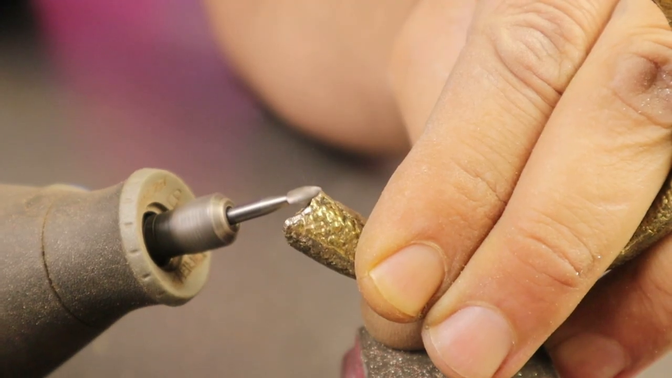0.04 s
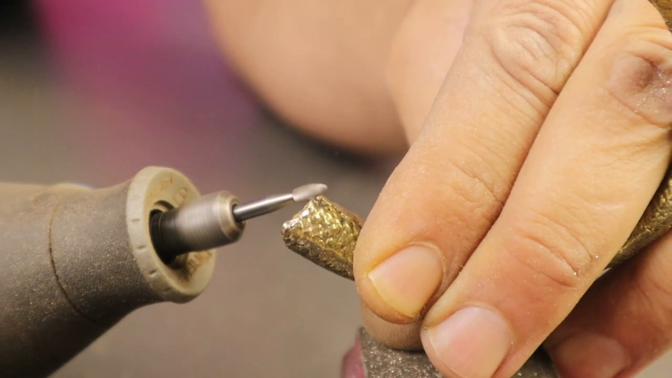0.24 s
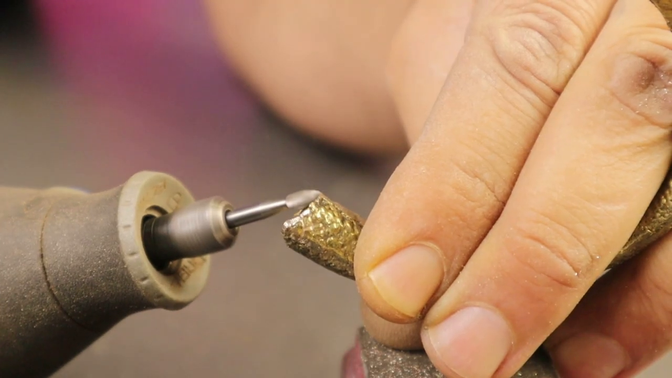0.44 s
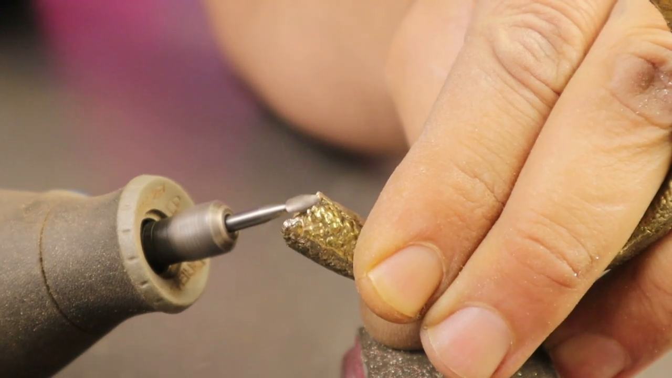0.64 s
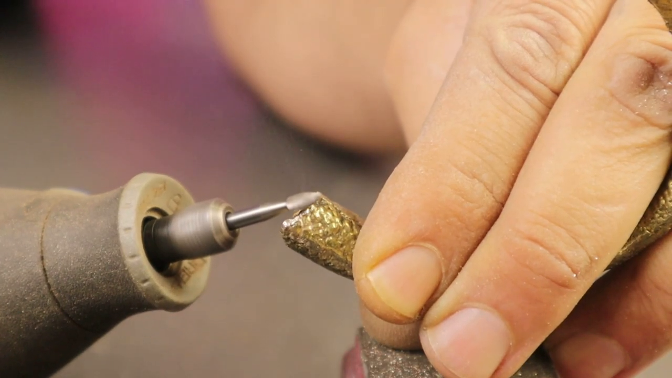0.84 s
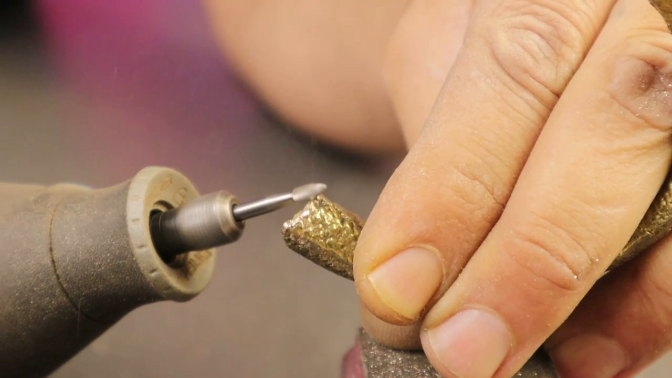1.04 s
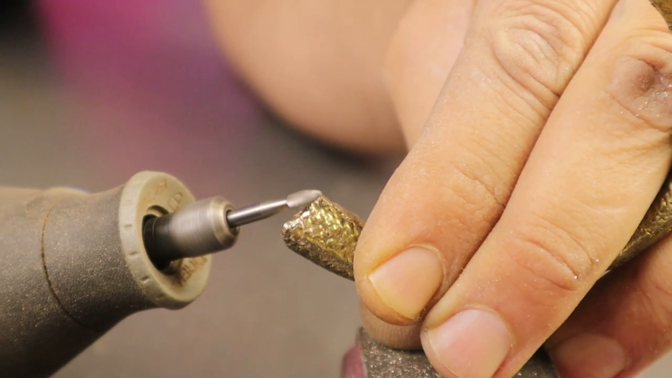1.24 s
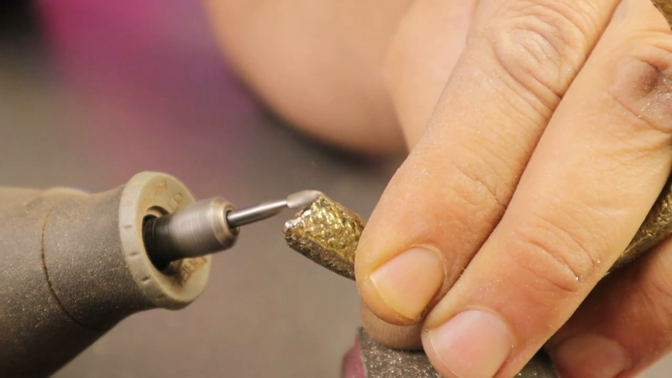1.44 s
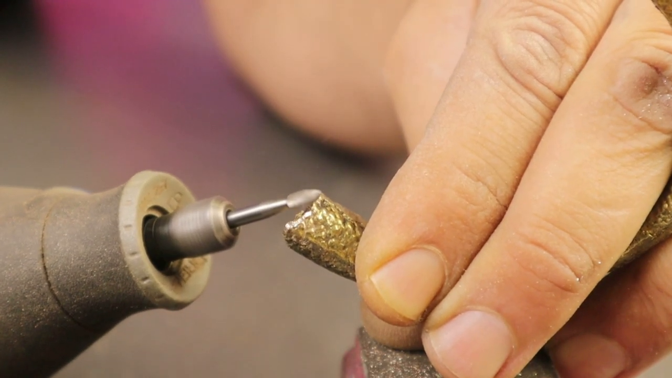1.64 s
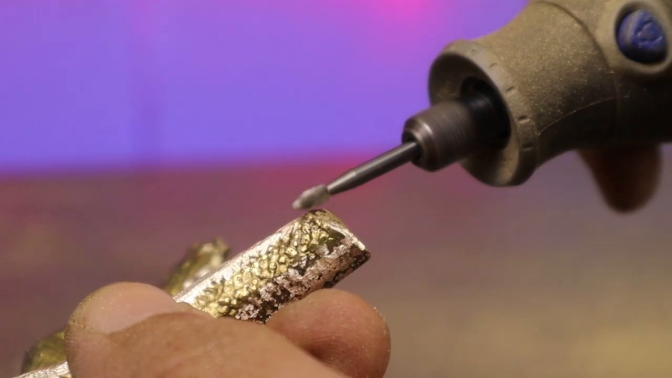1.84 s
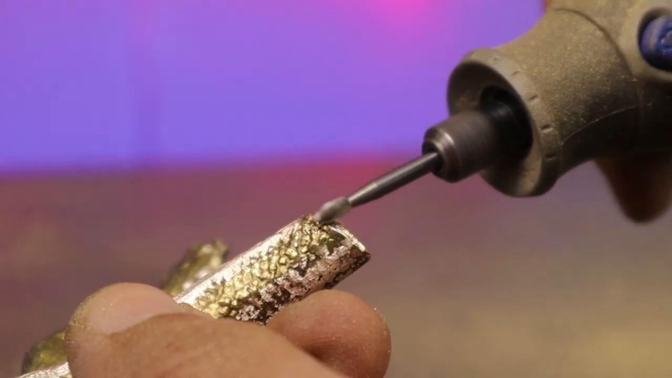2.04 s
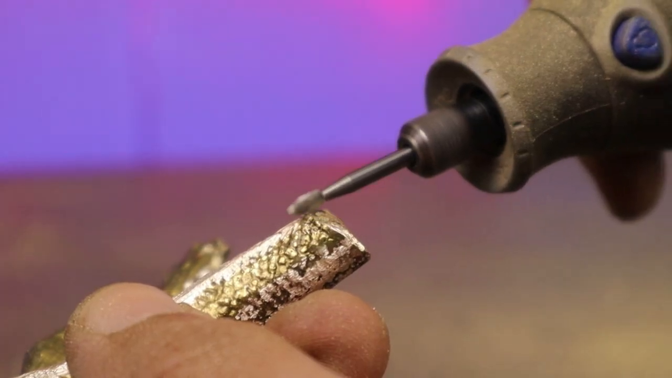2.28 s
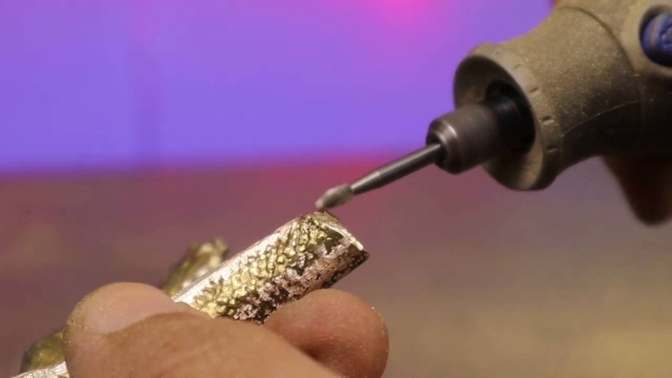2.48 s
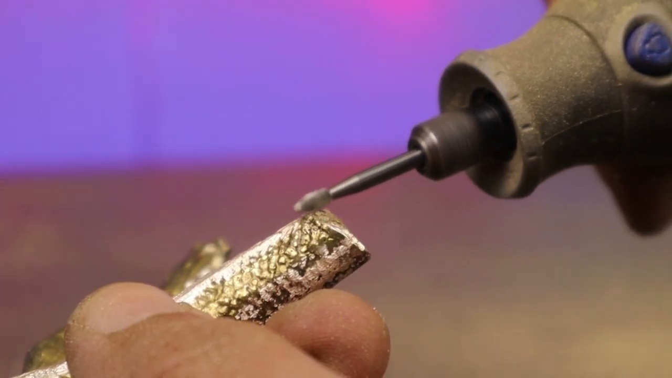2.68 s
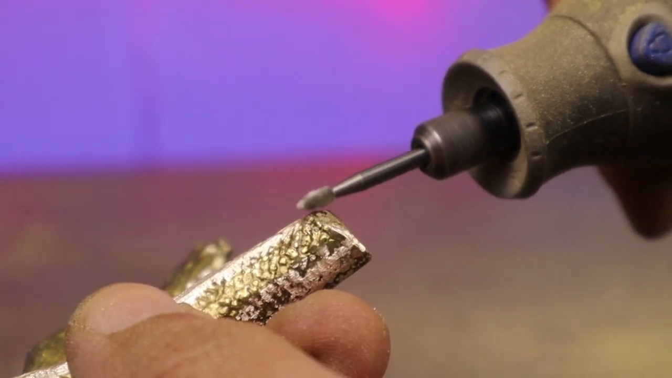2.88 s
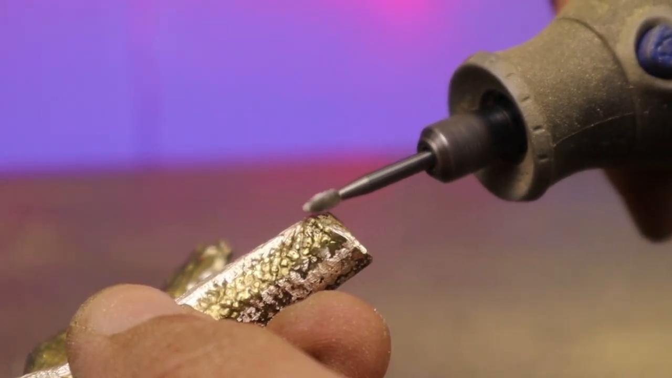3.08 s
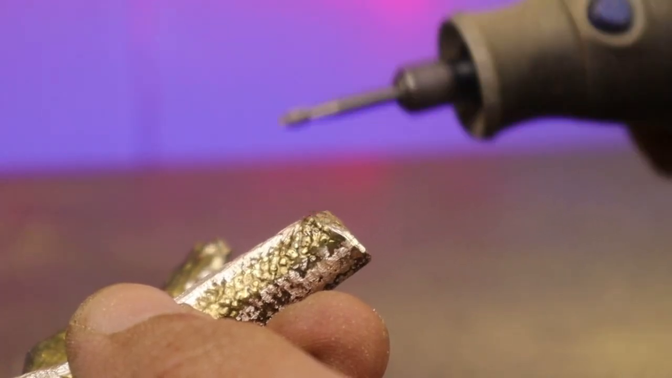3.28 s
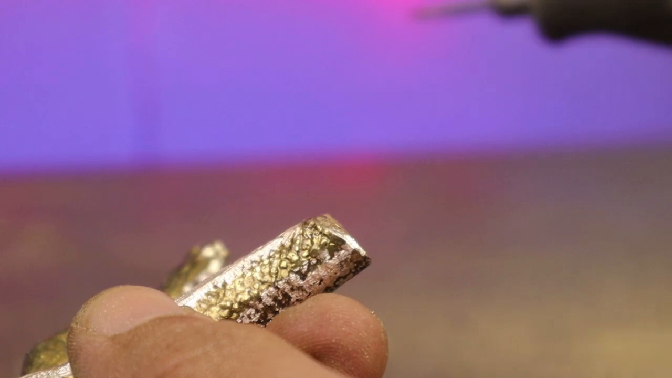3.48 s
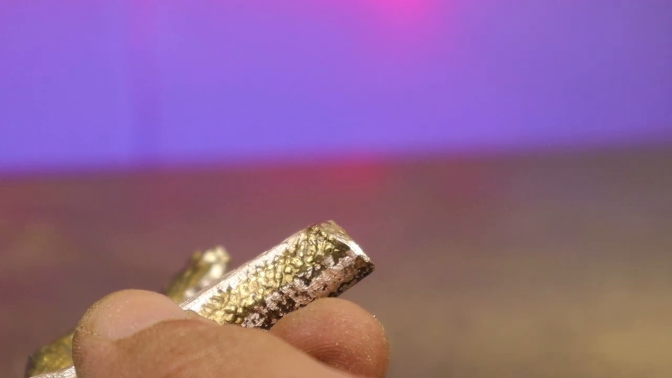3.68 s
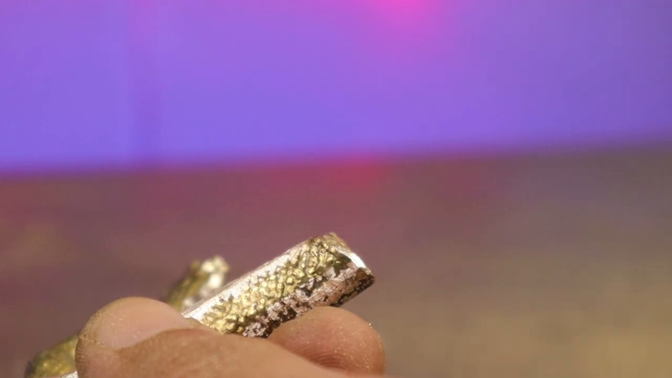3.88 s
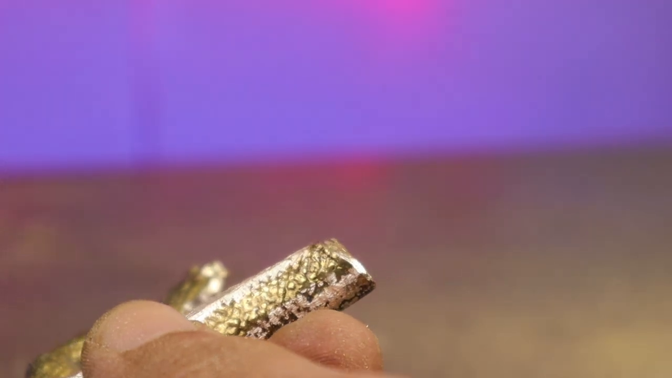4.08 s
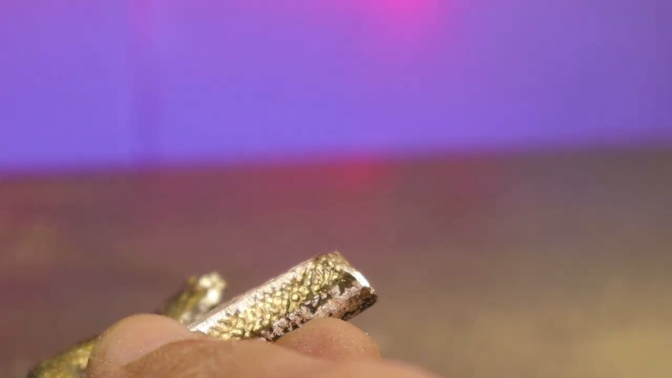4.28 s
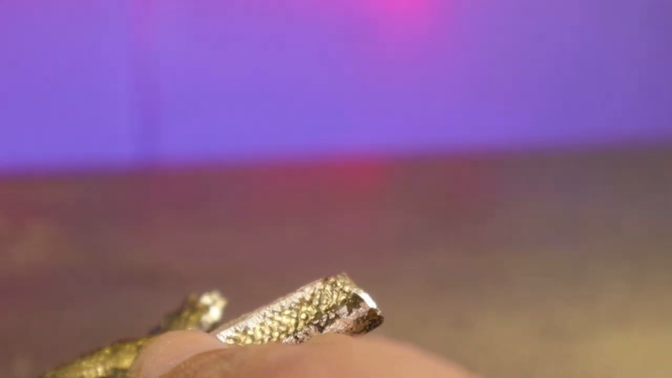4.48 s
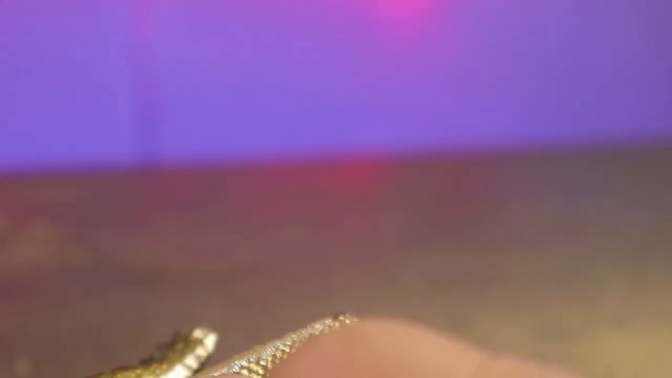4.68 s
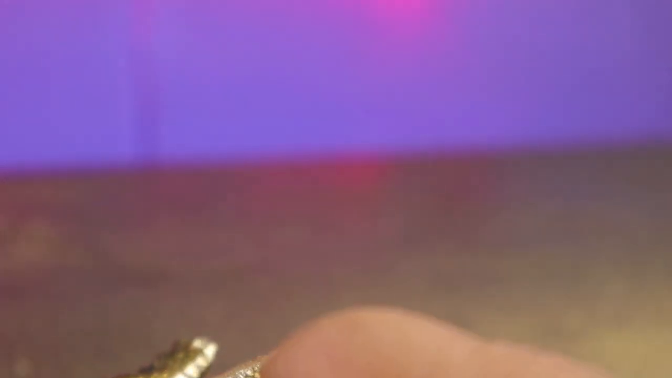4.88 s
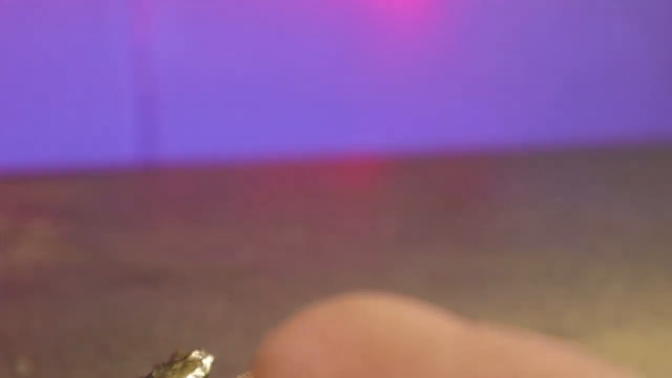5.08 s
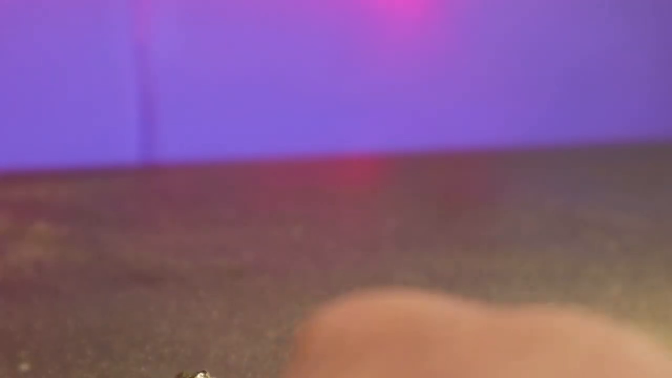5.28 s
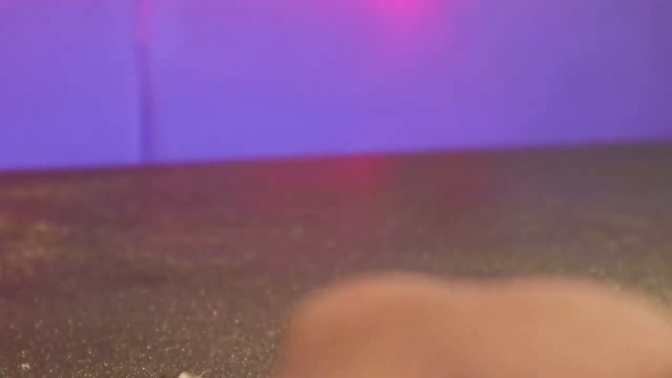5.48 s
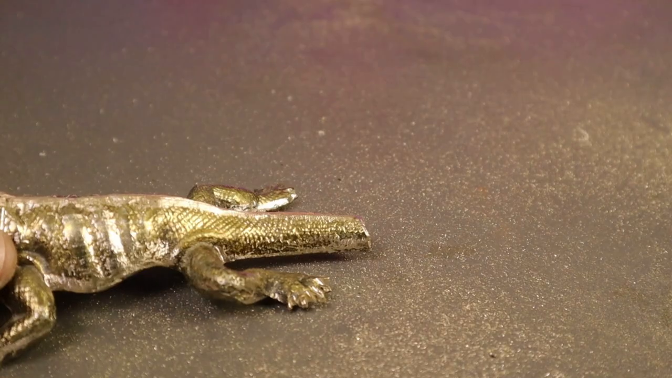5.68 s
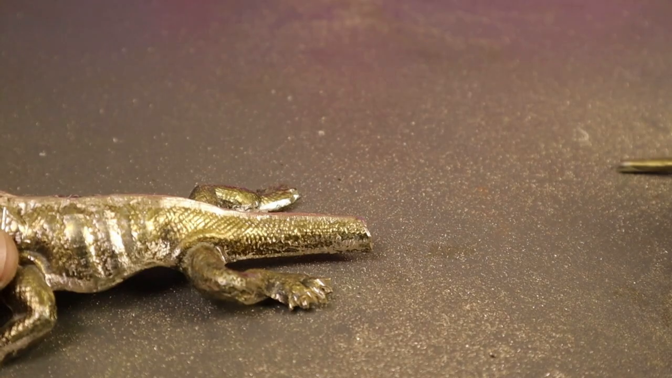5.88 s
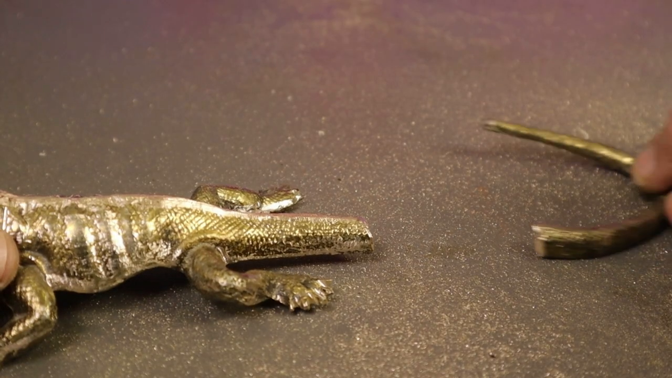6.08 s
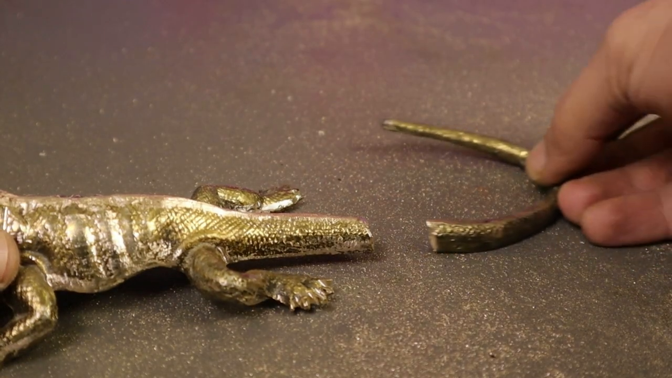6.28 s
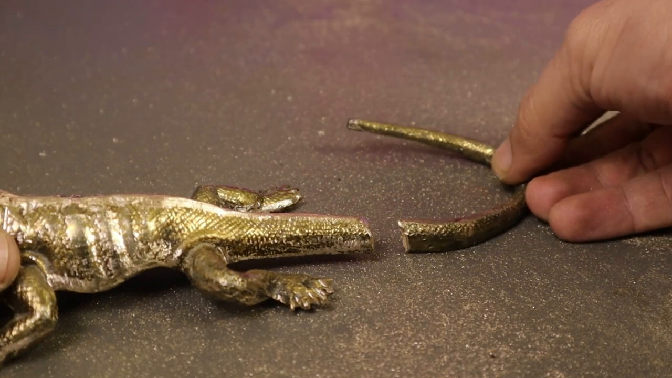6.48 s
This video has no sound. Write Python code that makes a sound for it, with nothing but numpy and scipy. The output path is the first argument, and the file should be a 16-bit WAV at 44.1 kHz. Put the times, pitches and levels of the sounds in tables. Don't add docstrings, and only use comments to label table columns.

```python
import sys
import numpy as np
from scipy import signal
from scipy.fft import rfft, irfft, dct
from scipy.io import wavfile
from scipy.ndimage import uniform_filter1d

SR = 44100
rng = np.random.default_rng(int(sys.argv[2]) if len(sys.argv) > 2 else 0)


def to_wav(sig):
    pcm = np.clip(np.atleast_2d(sig), -1, 1) * 32767
    pcm = np.round(pcm).astype(np.int16)
    wavfile.write(sys.argv[1], SR, pcm.T)


def gain_from_decibels(decibels):
    exponent = np.asarray(decibels, float) / 20
    return 10 ** exponent


N = 287973

# (frequency [Hz], level [dB], t60 [s])
BENCH = [(390, -40, 0.03), (482, -13.5, 0.044), (567, -6.5, 0.024), (685, -17, 0.01), (870, -8, 0.016),
         (1117, -10.5, 0.007)]
# (frequency [Hz], level [dB], t60 [s])
BRASS_PIECE = [(1440, 1, 0.007), (1820, 1, 0.0082), (2180, -4.5, 0.0078), (2600, -5.5, 0.0063),
               (3540, -7, 0.0073), (5500, -20, 0.0016), (8100, -18, 0.0083), (13530, -39, 0.037)]


def rms_one(x):
    return x / np.sqrt(np.mean(x ** 2) + 1e-20)


def in_time(rows):
    s, *columns = np.transpose(rows)
    return [np.interp(np.arange(N) / SR, s, c) for c in columns]


def bumps(rows, along):
    return sum(db * np.exp(-((along - at) / width) ** 2) for at, width, db in rows)


def drift(rate_hz):
    step = 16
    r = np.exp(-2 * step * np.pi * rate_hz / SR)
    slow = signal.lfilter([1], [1, -2 * r, r * r], rng.standard_normal(N // step + 3002))[3000:]
    return np.interp(np.arange(N) / step, np.arange(len(slow)), rms_one(slow))


def coloured(spectrum):
    hz, db = np.transpose(spectrum)
    log_hz = np.log(np.fft.rfftfreq(N, 1 / SR) + 1)
    gain = gain_from_decibels(np.interp(log_hz, np.log(hz), db))
    return rms_one(irfft(rfft(rng.standard_normal(N)) * gain, N))


def high_pass(x, order, hz):
    return signal.sosfilt(signal.butter(order, hz, "high", fs=SR, output="sos"), x)


def resonate(x, hz, width_hz):
    r = np.exp(-np.pi * width_hz / SR)
    poles = [1, -2 * r * np.cos(2 * np.pi * hz / SR), r * r]
    return signal.lfilter([(1 - r * r) / 2, 0, (r * r - 1) / 2], poles, x + 1e-18)


def ring(clicks, modes):
    out = np.zeros(N)
    for hz, db, t60_s in modes:
        r = gain_from_decibels(-60 / (t60_s * SR))
        w = 2 * np.pi * hz / SR
        out += gain_from_decibels(db) * signal.lfilter([0, np.sin(w)], [1, -2 * r * np.cos(w), r * r], clicks + 1e-18)
    return out


def clicks_at(times_s, db):
    clicks = np.zeros(N)
    clicks[(np.asarray(times_s) * SR).astype(int)] = gain_from_decibels(db)
    return clicks


def pushes(times_s, db, length_s):
    r = np.exp(-1 / (length_s * SR))
    return signal.lfilter([(1 - r) ** 2], [1, -2 * r, r * r], clicks_at(times_s, db))


def contacts(times_s, db, length_s):
    r = np.exp(-1 / (length_s * SR))
    swell = signal.lfilter([0, np.sqrt(1 - r) * (1 - r) * 2], [1, -2 * r, r * r], clicks_at(times_s, db))
    return swell * rng.standard_normal(N)


def air():
    # (frequency [Hz], density [dB per Hz])
    room_noise = [(120, -41), (200, 4), (260, 3.5), (334, 3.5), (1440, -7), (1730, -9.5), (4150, -25),
                  (15800, -60.5)]
    whistle_hz, width_hz, whistle_db, whistle_from_s = 1745, 20, -64, 5.38
    t = np.arange(N) / SR
    narrow = resonate(rng.standard_normal(N), whistle_hz, width_hz)
    whistle = rms_one(resonate(narrow, whistle_hz, width_hz)) * np.clip((t - whistle_from_s) * 20, 0, 1)
    return gain_from_decibels(-54) * coloured(room_noise) + gain_from_decibels(-57) * rng.standard_normal(N) + gain_from_decibels(whistle_db) * whistle


def hands():
    # (frequency [Hz], density [dB per Hz])
    hand_colour = [(20, -26), (45, -15), (65, 8.5), (95, -2.5), (140, 9.5), (200, 0.5), (300, -12),
                   (1200, -72)]
    # (time [s], width [s], swell [dB])
    grips = [
        (.06, 0.22, 16.5),
        (.87, 0.11, 8.5),
        (1.69, 0.054, 11),
        (4.7, 1, 9),
        (5.6, 0.27, 2.5),
        (6.24, 0.11, 15),
    ]
    level_db = -58.5 + 1.5 * drift(2.5) + bumps(grips, np.arange(N) / SR)
    return gain_from_decibels(level_db) * coloured(hand_colour)


def shop(x):
    t60_s = .32
    t = np.arange(int(t60_s * SR)) / SR
    tail = signal.lfilter([.4], [1, -.6], rng.standard_normal(len(t)))
    tail = tail * gain_from_decibels(-60 * t / t60_s) * (t > .006)
    return signal.fftconvolve(x, tail / np.sqrt(np.sum(tail ** 2)))[:N]


def housing_and_fan(turns, speed_hz, share):
    # (frequency [Hz], density [dB per Hz])
    housing_colour = [(200, -50.5), (271, -21.5), (485, -11), (1040, -2), (2400, -5), (4700, -7),
                      (6110, -17), (10300, -120)]
    # (frequency [Hz], density [dB per Hz])
    fan_colour = [(3500, -55), (4800, -20), (5700, -0.5), (7300, 5), (8900, 1.5), (9600, -3.5),
                  (13000, -10), (15800, -4.5)]
    throb = (1 + .25 * np.cos(2 * np.pi * turns)) * gain_from_decibels(.6 * drift(15))
    rumble = gain_from_decibels(-29.5) * share ** 1.15 * coloured(housing_colour)
    hiss = gain_from_decibels(-29) * share ** 1.63 * coloured(fan_colour)
    ringing = rms_one(resonate(rng.standard_normal(N), 1200, width_hz=350))
    ring_db = -52.5 + bumps([(156, 83, 22.5)], speed_hz)
    return throb * (rumble + hiss) + gain_from_decibels(ring_db) * share * ringing


def whine(turns, speed_hz, share):
    # (multiple of spindle, level at full speed [dB], level when slow [dB])
    whine_lines = [(1, -18, -30), (13, -13, -13), (15, -13, -13), (16, -11, -7), (18, 1, -4),
                   (20, -22, -10), (21, -24, -10), (22, -10, -9), (24.15, -30, -3), (25.2, -26, -8),
                   (26, -20, -9), (27, -22, -9), (28, -16, -10), (30, -16, -9), (31, -14, -11),
                   (32, -11, -9), (34, -16, -11), (36, -16, -8), (38, -18, -9), (41, -20, -10),
                   (44, -20, -11), (47, -22, -11), (50, -24, -11), (54, -24, -12)]
    # (multiple of spindle, level at full speed [dB], level when slow [dB])
    bearing_lines = [(7.64, -10, -40), (8.0, -8, -40), (8.365, -8, -40), (8.73, -6, -40), (9.09, -11, -40)]
    # (time [s], width [s], swell [dB])
    bearing_swell = [
        (3.91, .09, 9),
    ]
    # (time [s], width [s], swell [dB])
    brush_lifts = [
        (3.29, .05, -12),
        (3.52, .04, -11),
        (3.92, .04, -6),
        (4.62, .06, -4),
    ]
    # (time [s], level [dB])
    brush_line = [(3.1, -33), (3.29, -47), (3.4, -30), (3.52, -43), (3.6, -32), (3.65, -29.5),
                  (3.86, -30.5), (3.92, -40), (4.02, -33), (4.12, -36.5), (4.3, -40), (4.39, -36),
                  (4.46, -32), (4.54, -38), (4.68, -48), (4.9, -40), (5.05, -54), (5.2, -110)]
    # (frequency [Hz], width [Hz], swell [dB])
    whine_path = [(3480, 280, 6), (4250, 420, -9), (1750, 220, 4), (2300, 300, -4), (5300, 300, 1),
                  (6300, 700, -4), (7800, 600, 6), (10300, 900, -3)]
    # (multiple of spindle, time [s], width [s], swell [dB])
    flares = [(16, 4.3, .1, 2), (22, 4.2, .14, -9), (24.15, 4.64, .07, 4), (24.15, 4.85, .08, 7),
              (24.15, 4.3, .05, 8), (30, 4.14, .07, 9), (32, 4.2, .1, 5), (36, 4.25, .16, 5),
              (38, 4.3, .12, 7), (41, 4.5, .15, -5), (44, 4.5, .15, -7), (8.0, 4.69, .05, 34),
              (32, 4.75, .15, 3), (28, 4.77, .06, -5), (26, 4.7, .05, -4)]
    brush_multiple = 18
    t = np.arange(N) / SR
    first = t < 1.782
    whine_db = -33 - 5 * (1 / share - 1) + bumps(brush_lifts, t)
    slow = np.clip((275 - speed_hz) / 135, 0, 1)
    out = np.zeros(N)
    for multiple, fast_db, slow_db in whine_lines + bearing_lines:
        level_db = whine_db + fast_db + slow * (slow_db - fast_db) + 2.5 * drift(9)
        level_db += np.minimum(4 * slow, 1) * bumps(whine_path, multiple * speed_hz)
        if 7 < multiple < 10:
            level_db += 6.0 * first + bumps(bearing_swell, t)
        level_db += bumps([row[1:] for row in flares if row[0] == multiple], t)
        if multiple == brush_multiple:
            level_db = in_time(brush_line)[0] + drift(22)
        wobble = (.06 + .03 * slow) * drift(40)
        out += gain_from_decibels(level_db) * np.sin(2 * np.pi * (multiple * turns + wobble))
    return out


def motor(turns, speed_hz):
    share = speed_hz / 277
    first = np.arange(N) / SR < 1.782
    return (housing_and_fan(turns, speed_hz, share) + whine(turns, speed_hz, share)) * gain_from_decibels(1.5 * first)


def laid_down():
    # (time [s], level
    # [dB])
    touches = [(1.791, -22), (1.808, -34), (1.841, -23), (4.662, -28), (4.782, -31), (4.95, -15),
               (4.955, -6.5), (4.963, -4.5), (4.969, -11.5), (4.98, -11), (5.005, -20), (5.028, -24),
               (5.041, -33)]
    # (frequency [Hz], level [dB], t60 [s])
    tool_modes = [(215, -26.5, 0.024), (278, -7.5, 0.05), (341, 8.5, 0.071), (437, 12.5, 0.016),
                  (720, 13.5, 0.0059), (1170, 8.5, 0.016), (1380, 5.5, 0.016), (1700, 2, 0.02),
                  (2040, 6, 0.021), (2740, 7, 0.02)]
    s, db = np.transpose(touches)
    return high_pass(ring(pushes(s, db - 21.5, length_s=0.000079), tool_modes), 2, 150)


def rub():
    # (time [s], level [dB], brightness [dB])
    slide = [(5.55, -66, -20), (5.65, -33, -23), (5.71, -47, -18), (5.74, -32.5, -19), (5.83, -36, -8),
             (5.99, -24.5, -15), (6.06, -31, -2.5), (6.1, -29, 1), (6.136, -37, -2), (6.16, -28, -12),
             (6.19, -30, -3), (6.27, -25.5, -12), (6.36, -33, -5), (6.428, -28.5, -19), (6.53, -41.5, -13)]
    catches_per_s = 450
    level_db, bright_db = in_time(slide)
    struck = rng.random(N) < catches_per_s / SR
    force = gain_from_decibels(0.94 * np.minimum(rng.exponential(1, N), 4)) * rng.choice([-1, 1], N)
    catches = struck * force
    started = np.arange(N) > slide[0][0] * SR
    dull = rms_one(ring(catches, BENCH))
    bright = gain_from_decibels(bright_db) * rms_one(ring(catches, BRASS_PIECE))
    return started * gain_from_decibels(level_db) * (dull + bright)


def knocks():
    # (time [s], peak [dB], brightness [dB])
    hits = [(5.598, -40, -20), (5.618, -29, -17), (5.642, -19.5, -24), (5.728, -24, -16), (5.733, -17, -15),
            (5.761, -29, -16), (5.794, -38, -17), (5.814, -26, -14), (5.842, -13, -8), (5.888, -25, -9),
            (5.914, -19, -14), (5.944, -24, -12), (5.953, -19, -7), (5.962, -21, -15), (5.966, -11, -13),
            (5.973, -11, -11), (5.985, -11, -6), (5.992, -16, 0), (5.998, -11, -11), (6.007, -10, -11),
            (6.015, -15, -11), (6.02, -14, -13), (6.041, -13, -10), (6.05, -15, -15), (6.068, -18, -3),
            (6.074, -13, -4), (6.079, 2, 2), (6.093, -8, -8), (6.097, -20, -6), (6.105, -13, -1),
            (6.115, -14, -4), (6.149, -7, -3), (6.151, -7, -5), (6.162, -15, -9), (6.165, -6, -3.5),
            (6.207, -12, -8), (6.217, -8.5, -4), (6.226, -5, -6.5), (6.242, -14, -12), (6.266, -15, -14),
            (6.28, -9.5, -11), (6.306, -18, -10), (6.318, -12, -6), (6.347, -13.5, -11),
            (6.372, -13.5, -13), (6.393, -10, -9), (6.419, -9, -19), (6.461, -16.5, -12)]
    # (frequency [Hz], level [dB], t60 [s])
    point_modes = [(332, -17.5, 0.0072), (478, -1.5, 0.015), (676, -3, 0.0089), (900, -5.5, 0.013),
                   (1200, -13, 0.0045)]
    s, db, bright_db = np.transpose(hits)
    bench = ring(pushes(s, db - 2.0, length_s=0.0001), point_modes)
    return bench + ring(contacts(s, db + bright_db - 9.5, length_s=0.0013), BRASS_PIECE)


def ticks():
    # (time [s], peak [dB])
    grit = [(5.9318, -37), (6.0172, -34), (6.036, -27), (6.0786, -38), (6.1495, -41), (6.2002, -20),
            (6.215, -22), (6.291, -26), (6.307, -25), (6.3917, -32), (6.4075, -27.5), (6.493, -36.5)]
    # (frequency [Hz], level [dB], t60 [s])
    edge_modes = [(8600, 1, 0.0014), (7000, -20.5, 0.053), (9800, -25, 0.23), (11000, -35, 0.054),
                  (13530, -21.5, .08)]
    s, db = np.transpose(grit)
    touch = contacts(s, db + 6, length_s=0.00046)
    return high_pass(touch + gain_from_decibels(-8) * ring(touch, edge_modes), 2, 3000)


def drops():
    # (time [s], peak [dB])
    landings = [
        (6.0795, 2),
        (6.0812, 5),
        (6.2275, -6),
    ]
    s, db = np.transpose(landings)
    push = np.zeros(N)
    push[(s * SR).astype(int)] = gain_from_decibels(db) * (-1) ** np.arange(len(s))
    push = signal.lfilter([.45], [1, -.55], push)
    return high_pass(gain_from_decibels(-14) * ring(push, BENCH) + gain_from_decibels(-12) * ring(push, BRASS_PIECE), 2, 220)


def bounce():
    landing_s, middle_s, width_s, per_s, depth_db = 1.91, 1.955, .06, 77, 10
    t = np.arange(N) / SR
    spell = np.exp(-((t - middle_s) / width_s) ** 4)
    return depth_db * spell * np.cos(2 * np.pi * per_s * (t - landing_s)), spell


def hum(turns):
    # (time [s], width [s], swell [dB])
    shakes = [
        (.45, .2, -1),
        (.95, 0.38, 23),
        (1.55, 0.16, 20),
        (1.83, 0.056, 39.5),
        (2.4, 0.09, 26),
        (2.84, .08, 24),
        (3.05, .06, 12.5),
    ]
    swing_db, spell = bounce()
    t = np.arange(N) / SR
    level = gain_from_decibels(-30 + .5 * swing_db) * spell + gain_from_decibels(-63 + bumps(shakes, t))
    return level * np.sin(2 * np.pi * turns) * (t < 3.25)


def strokes(cut, answers):
    # (time [s], place [-1 thick end to 1 thin end])
    burr_place = [(0, 0.17), (.19, 0.35), (.23, -0.79), (.37, -0.88), (.45, 0.19), (.56, .4), (.68, -.8),
                  (.82, 0.13), (1.0, .1), (1.1, 0.74), (1.3, 0.42), (1.5, -0.47), (1.75, 0.52),
                  (1.9, -0.0063), (2.25, -0.28), (2.6, 0.66), (2.8, -0.25), (3.1, 1)]
    bite_s, lift_s, graze_db = .013, .025, -30.5
    s, length_s, press_db, lean_db, flex = np.transpose(cut)[:, :, None]
    t = np.arange(0, N, 32) / SR
    shape = np.clip((t - s) / bite_s + .5, 0, 1) * np.clip((s + length_s - t) / lift_s + .5, 0, 1)
    place = np.interp(t, *np.transpose(burr_place))
    curves = []
    for rest_db, per_press, per_lean, flex_db, place_db in answers:
        stroke_db = rest_db + per_press * (press_db + 22) + per_lean * lean_db + flex_db * flex
        pressed = np.sum(shape * gain_from_decibels(stroke_db), axis=0)
        curves.append(gain_from_decibels(place_db * place) * pressed + gain_from_decibels(rest_db + graze_db + 14.5))
    curves.append(np.sum(shape * flex, axis=0))
    return [np.interp(np.arange(N) / SR, t, c) for c in curves]


def favour(hz, end):
    # (resonance [Hz], time [s], width [s], swell [dB])
    favoured = [(537, 0.12, 0.15, -5), (1075, .16, 0.043, 2.5), (1696, 0.31, 0.12, 5.5),
                (1075, .33, 0.048, 2.5), (3380, .46, .06, 4), (1696, .08, .1, -5), (2290, .3, .08, -7),
                (3380, 0.083, 0.11, 4), (3770, .15, .05, 5.5), (4430, 0.13, 0.15, -3.5),
                (4740, .12, 0.083, 0), (4740, 0.48, .03, -3), (2970, 0.29, 0.052, 2), (3770, 0.42, .08, -5),
                (3770, .72, 0.072, 1), (3770, 1, 0.066, -5), (1696, 0.66, .1, -7), (290, 1.0, 0.23, -12),
                (3946, 1.94, .07, 5.5), (4120, 1.82, .04, -11), (3946, 1.81, 0.039, -10),
                (3490, 1.88, 0.14, -16), (4250, 3.5, .02, 17.5), (3946, 2.7, .025, 12),
                (2770, 1.81, .03, 1.5), (3070, 1.82, 0.046, 0), (1654, 1.93, .06, -2.5),
                (2770, 2.13, 0.071, 5), (2770, 2.25, 0.035, 3.5), (3070, 2.25, .05, 6.5),
                (3946, 1.6, .05, -2), (1654, 3.3, .05, -1.5), (1654, 5, .08, 0.5), (3946, 3.04, 0.093, 1),
                (2790, 2.93, 0.11, -4.5), (3070, 2.85, .1, -2), (4080, 4, .03, -6)]
    rows = [row[1:] for row in favoured if abs(np.log(row[0] / hz)) < .02]
    return gain_from_decibels(bumps(rows, np.arange(end) / SR))


def grinding(turns, cut, answers, skip, rings, rough, uneven_db, chatter_db, chips):
    slip_turns, second_flute, flutter_db, chip_s = .002, .3, 1.1, .0007
    *gains, flex = strokes(cut, answers)
    swing_db = bounce()[0]
    slipping = turns + slip_turns * (drift(150) + 2 * drift(15))
    at = np.flatnonzero(np.diff(np.floor(slipping)) > 0)
    behind = np.clip(at + (30 + 4 * drift(2.5)[at]).astype(int), 0, N - 1)
    weak = 1 - np.clip(skip * flex[at], 0, 1) * (np.arange(len(at)) % 2)
    scatter_db = uneven_db * rng.standard_normal(len(at)) + chatter_db * drift(70)[at] + swing_db[at]
    fade = np.exp(-1 / (chip_s * SR))
    end = int((cut[-1][0] + .2) * SR)
    out = np.zeros(N)
    for gain, modes, share in zip(gains, rings, rough):
        force = np.zeros(N)
        force[at] = weak * gain_from_decibels(share * scatter_db)
        force[behind] += second_flute * force[at]
        spray = .37 * signal.lfilter([np.sqrt(1 - fade)], [1, -2 * fade, fade * fade], force)
        drive = force + share * chips * spray * rng.standard_normal(N)
        tone, power = np.zeros(end), np.zeros(end)
        plain = np.zeros(end)
        for k, (hz, width_hz, db) in enumerate(modes):
            flutter = gain_from_decibels(db + flutter_db * drift(14)[:end])
            part = (-1) ** k * flutter * resonate(drive[:end], hz, width_hz)
            plain += part
            tone += favour(hz, end) * part
        power = uniform_filter1d(plain ** 2, 8000)
        out[:end] += gain[:end] * tone / np.sqrt(power + 1e-12)
    t = np.arange(N) / SR
    out = out * gain_from_decibels(.35 * swing_db)
    fade_in = np.clip((t - cut[0][0]) / .016 + 1, 0, 1)
    fade_out = np.clip((cut[-1][0] + cut[-1][1] - t) / .05 + 1, 0, 1)
    return out * fade_in * fade_out


def first_position(turns):
    # (time [s], length [s], pressure [dB], lean to thin edge [dB], shank flex [0-1])
    first_cut = [(0, 0.083, -19, -1.5, 0.84), (0.093, 0.1, -16, -6.5, 1), (0.212, 0.04, -20, -10.5, 1),
                 (0.243, 0.027, -19.5, 2.5, 0.4), (0.273, 0.061, -22.5, -2.5, 0.56),
                 (0.348, 0.044, -23.5, 1, 0), (0.408, 0.081, -21.5, 4, 0.54), (0.494, 0.055, -24.5, 3, 0),
                 (0.599, 0.091, -20.5, -0.5, 0.3), (0.674, 0.1, -16, -5.5, 1),
                 (0.787, 0.12, -20.5, -1, 0.6), (0.912, 0.13, -21.5, 1.5, 0),
                 (1.046, 0.074, -20.5, 4.5, 0.36), (1.152, 0.028, -22.5, 2, 0),
                 (1.192, 0.027, -20, -1.5, 0.47), (1.288, 0.0043, -19.5, 2, 0.2),
                 (1.359, 0.015, -17.5, -5, 1), (1.385, 0.038, -22, 3, 0.2), (1.43, 0.07, -20, -5, 1),
                 (1.505, 0.099, -20.5, 1, 0.31), (1.633, 0.05, -21, 1, 0), (1.7, 0.029, -24, 2.5, 0)]
    # (frequency [Hz], width [Hz], level [dB])
    first_rings = [
        [(290.4, 46, -14), (542, 42, -4), (803, 266, -3.5), (1075, 226, 0.5)],
        [(1650, 72, 0)],
        [(2300, 150, -8.5), (3014, 110, -2.5)],
        [(3150, 120, -5), (3764, 210, 7)],
        [(4440, 150, -1), (4735, 500, -4), (5020, 310, -8)],
        [(5440, 400, -8), (6100, 330, -2.5), (7050, 350, -4.5), (9800, 540, -20), (11870, 230, -14.5),
         (13300, 900, -19.5)],
    ]
    # (rest [dB], pressure [dB/dB], lean [dB/dB], full flex [dB], place [dB/unit])
    first_answer = [(-27.5, 1.3, 0, -6.5, 1.5), (-37, 1, 0, -2.5, -6), (-34, 1, 1.23, 2, 2.5),
                    (-30, 2.1, 1.47, 3, 1.5), (-21.5, 1.5, 0, -5, 1.5), (-21.5, 2, 0.45, -6, 1.5)]
    first_rough = (.4, .25, .35, .35, .5, .7)
    return grinding(turns, first_cut, first_answer, .57, first_rings, first_rough,
                    uneven_db=1.3, chatter_db=1.3, chips=.1)


def second_position(turns):
    # (time [s], length [s], pressure [dB], lean to thin edge [dB], shank flex [0-1])
    second_cut = [(1.794, 0.048, -18, -3, 0.82), (1.845, 0.05, -20, -3.5, .25),
                  (1.891, 0.096, -22, 1.5, .2), (2.1, 0.11, -27, -7.5, 0.39),
                  (2.202, 0.092, -23, -2.5, 0.72), (2.302, 0.061, -23, 2, .1),
                  (2.371, 0.052, -22.5, -5.5, .4), (2.417, 0.076, -22, 4, .3), (2.535, 0.019, -29.5, 7, .2),
                  (2.591, 0.038, -21.5, 10.5, .3), (2.641, 0.043, -29, -1.5, .2),
                  (2.681, 0.092, -24, 4, .1), (2.78, 0.13, -23, 0, 0.16), (2.899, 0.073, -24.5, 9, .3),
                  (2.97, 0.2, -20.5, 3, .2), (3.15, 0.062, -26.5, -11, 0.57), (3.199, 0.02, -22.5, 9, .2)]
    # (frequency [Hz], width [Hz], level [dB])
    second_rings = [
        [(563, 120, -12), (810, 390, 1.5), (1135, 480, 1)],
        [(1664, 88, -1.2), (1738, 120, -1.3)],
        [(2000, 1200, -16), (2790, 170, 4.5), (2956, 490, -1)],
        [(305, 240, -17.5), (3640, 1200, -6.5), (3944, 60, 5)],
        [(4200, 350, 0.5), (5350, 390, -6.5)],
        [(5750, 690, 0.5), (6980, 420, 1), (8800, 630, -4), (11840, 230, -6), (13600, 1900, -16)],
    ]
    # (rest [dB], pressure [dB/dB], lean [dB/dB], full flex [dB], place [dB/unit])
    second_answer = [(-31.5, 0.91, -0.75, .1, -4), (-22.5, 0.6, -0.58, 0.11, -2),
                     (-29.5, 1.1, -0.35, 10.5, -2), (-20, 3.1, 0.6, .1, -10.5),
                     (-25, 0.99, 0.54, 0.11, 1.5), (-20.5, 1.08, -0.048, .1, -1.5)]
    second_rough = (.7, .8, .75, .7, .7, 1)
    return grinding(turns, second_cut, second_answer, .2, second_rings, second_rough,
                    uneven_db=1.4, chatter_db=1.6, chips=.12)


def scene():
    # (time [s], rate [Hz])
    spindle = [(0, 277.8), (.38, 277.5), (.53, 272), (.78, 267.2), (1.27, 266), (1.6, 269.9),
               (1.785, 268.8), (1.79, 278.5), (2.2, 278.3), (2.35, 276.6), (3.3, 276.9), (3.96, 278.4),
               (4.03, 275.5), (4.1, 265), (4.5, 179), (4.9, 98.5), (5.1, 59), (5.4, 3)]
    speed_hz, = in_time(spindle)
    turns = np.cumsum(speed_hz) / SR
    background = air() + hands() + motor(turns, speed_hz)
    sliding = high_pass(rub() + knocks(), 3, 280)
    cut = high_pass(first_position(turns) + second_position(turns) + hum(turns), 3, 230)
    near = laid_down() + sliding + ticks() + drops() + cut
    return (background + near + gain_from_decibels(-11) * shop(near))[None]


def thin_out(x, keep_db):
    thin_s = [0.451, 1.009, 1.406, 1.453, 2.656, 3.752, 3.821]
    half = 768
    out, window = x.copy(), np.hanning(2 * half)
    for s in thin_s:
        frame = slice(int(s * SR) - half, int(s * SR) + half)
        lines = dct(x[frame] * window, norm="ortho")
        weak = np.abs(lines) < gain_from_decibels(keep_db) * np.sqrt(np.mean(lines ** 2))
        out[frame] -= dct(lines * weak, type=3, norm="ortho")
    return out


def band_limit(x):
    return signal.sosfilt(signal.butter(12, 15900, fs=SR, output="sos"), x)


def record(dry):
    rounded = 1.3 * np.tanh(dry[0] / 1.58)
    top_cut = signal.sosfilt(signal.cheby2(12, 60, 16150, fs=SR, output="sos"), rounded)
    mix = thin_out(top_cut, keep_db=-0.5)[None]
    return band_limit(mix)


dry = scene()
out = record(dry)
to_wav(out)
```